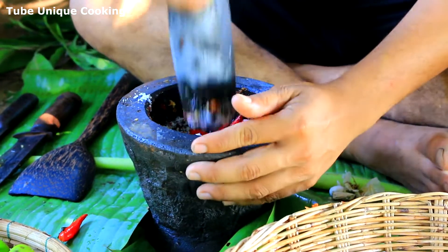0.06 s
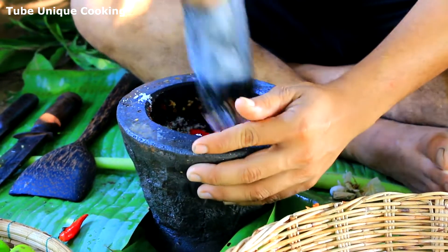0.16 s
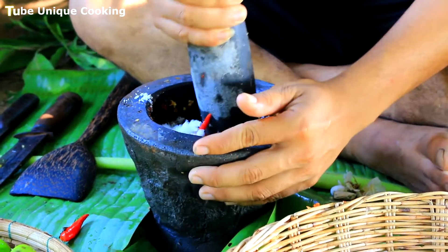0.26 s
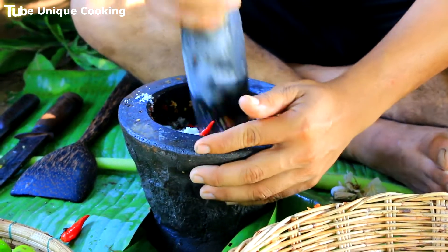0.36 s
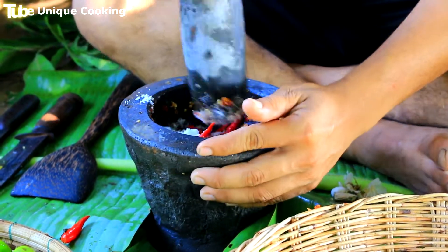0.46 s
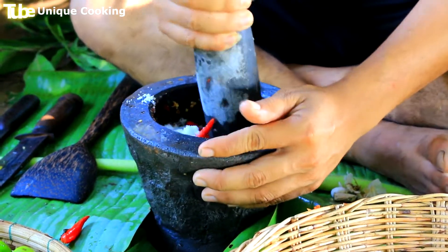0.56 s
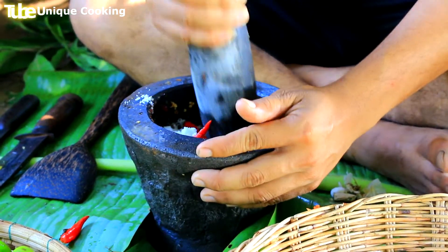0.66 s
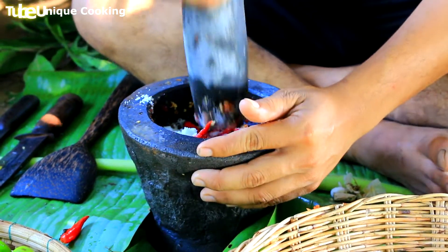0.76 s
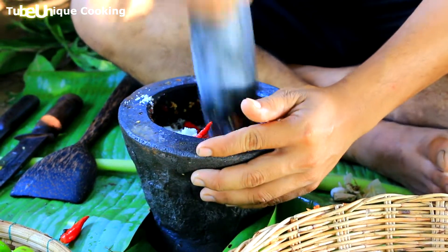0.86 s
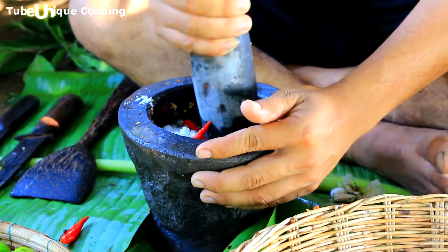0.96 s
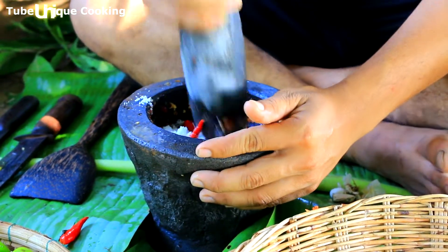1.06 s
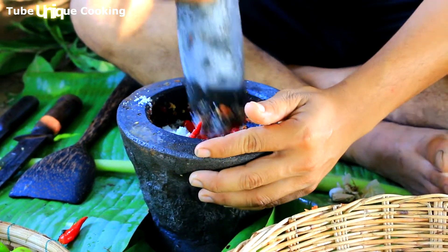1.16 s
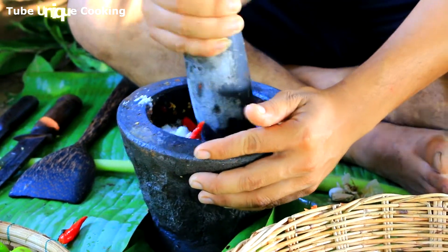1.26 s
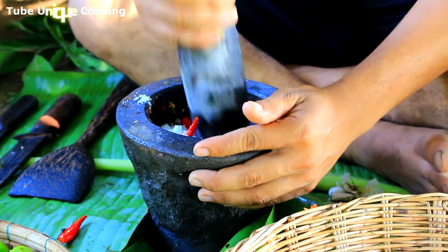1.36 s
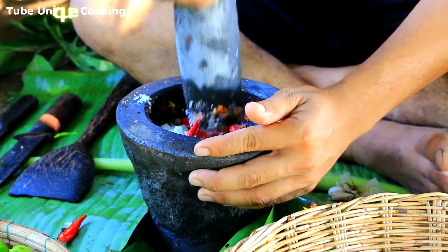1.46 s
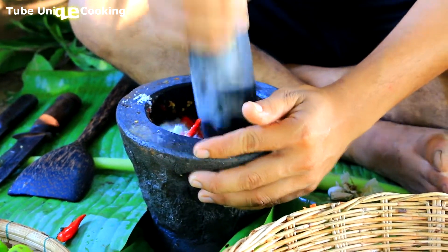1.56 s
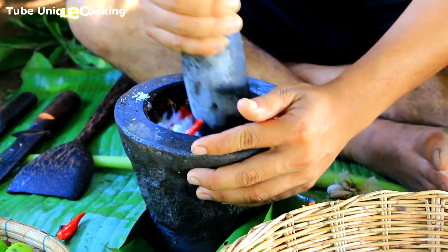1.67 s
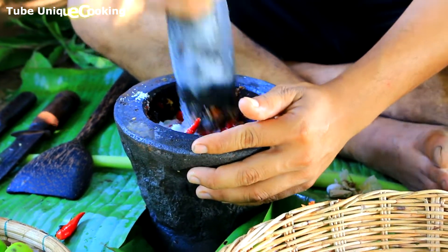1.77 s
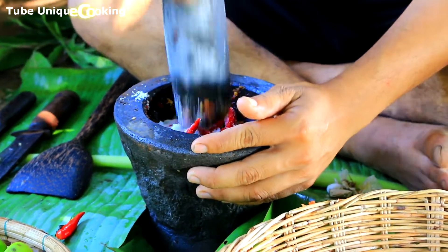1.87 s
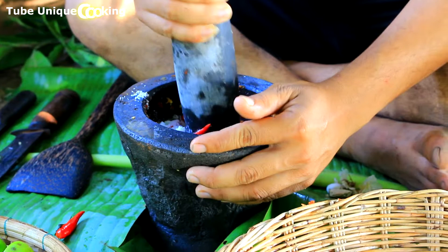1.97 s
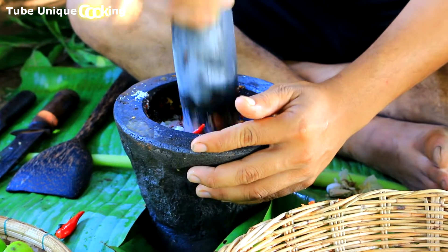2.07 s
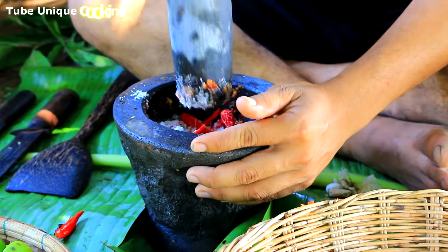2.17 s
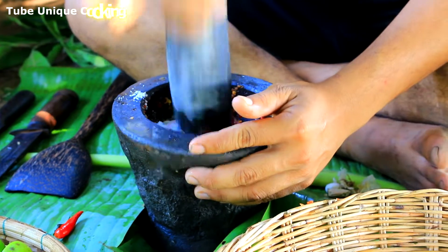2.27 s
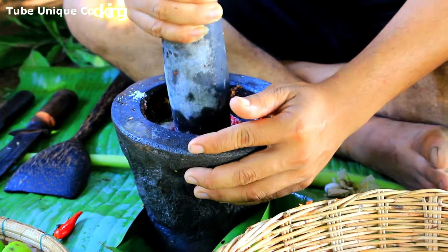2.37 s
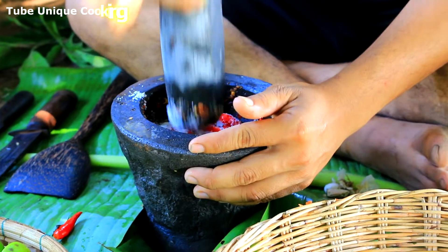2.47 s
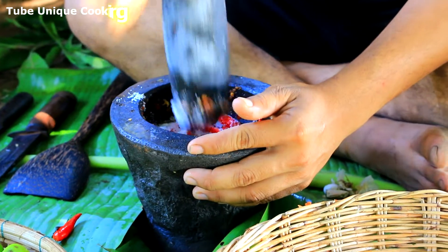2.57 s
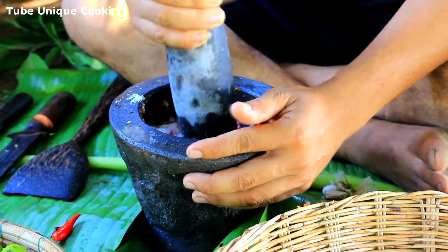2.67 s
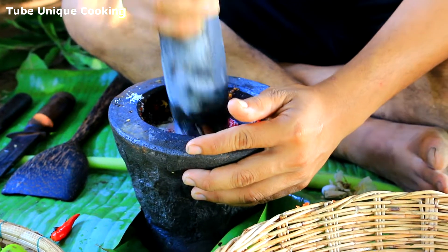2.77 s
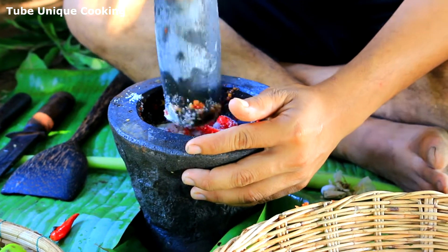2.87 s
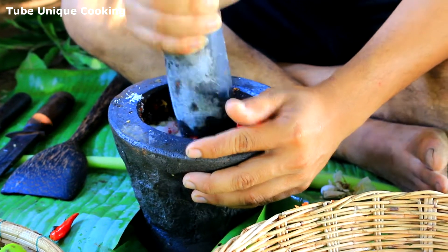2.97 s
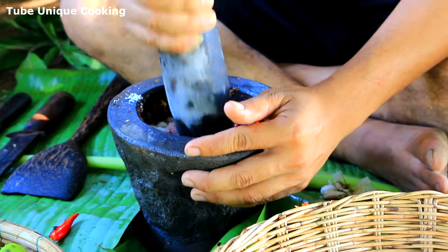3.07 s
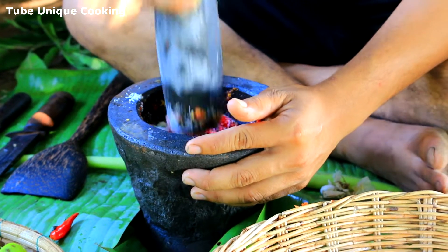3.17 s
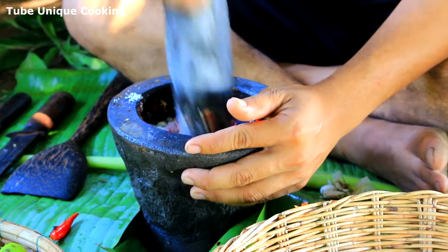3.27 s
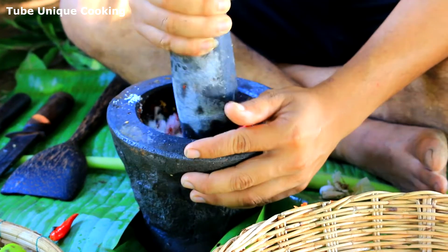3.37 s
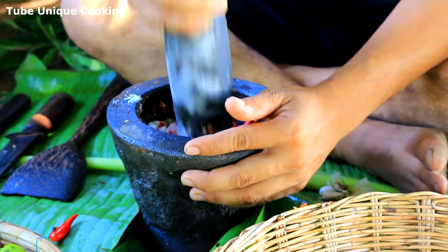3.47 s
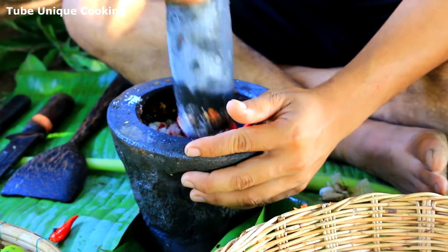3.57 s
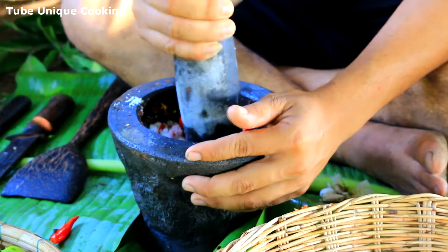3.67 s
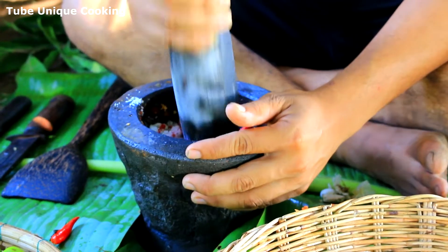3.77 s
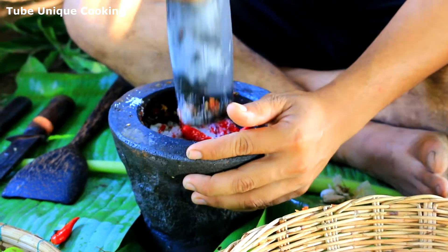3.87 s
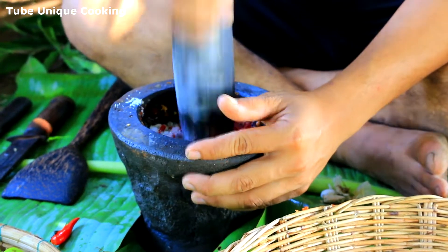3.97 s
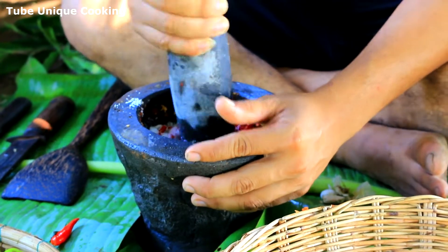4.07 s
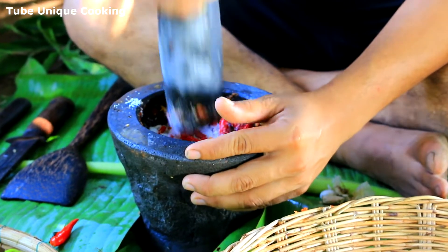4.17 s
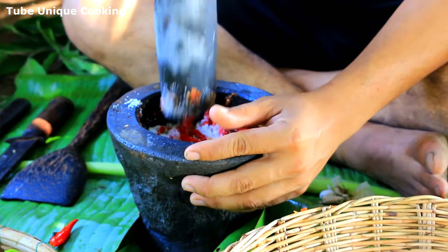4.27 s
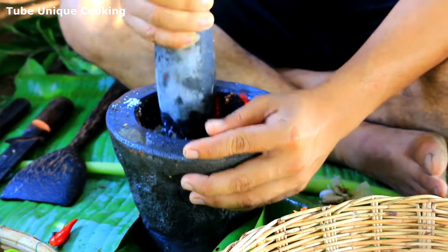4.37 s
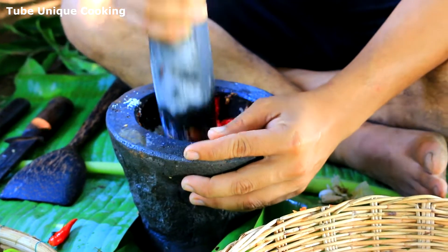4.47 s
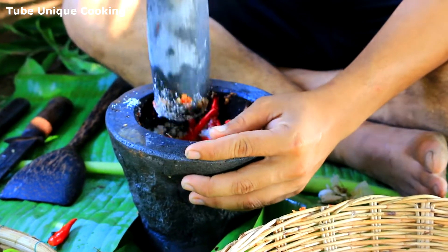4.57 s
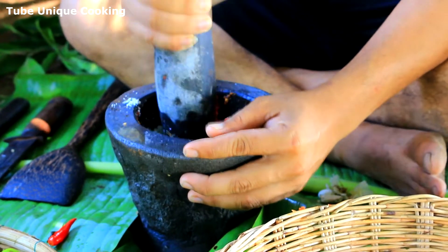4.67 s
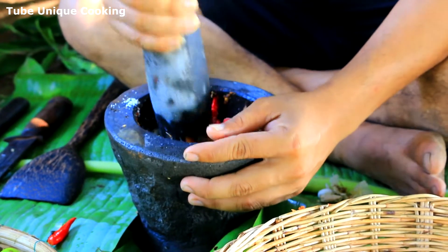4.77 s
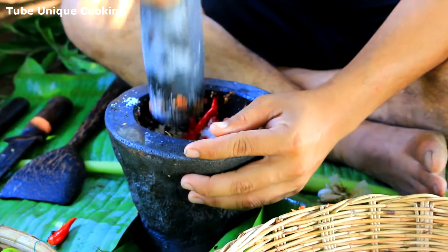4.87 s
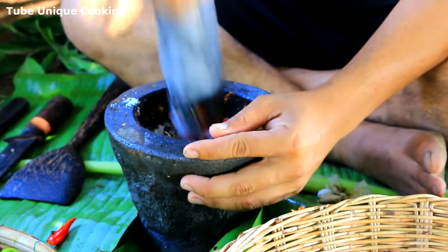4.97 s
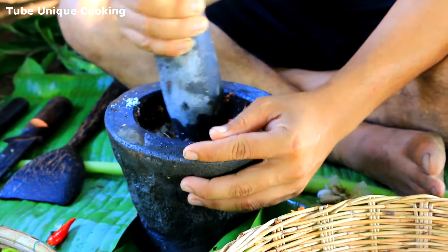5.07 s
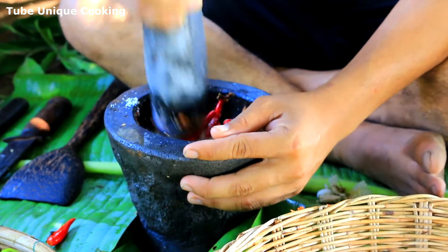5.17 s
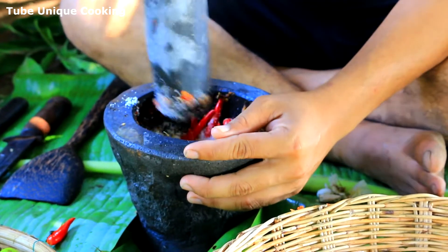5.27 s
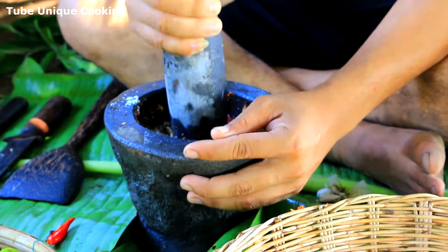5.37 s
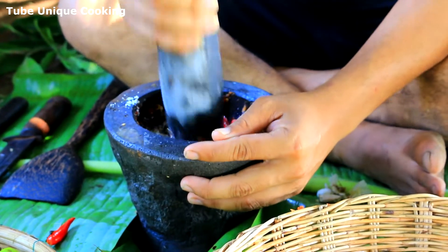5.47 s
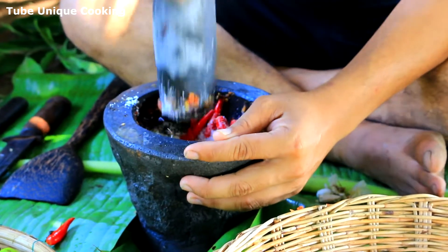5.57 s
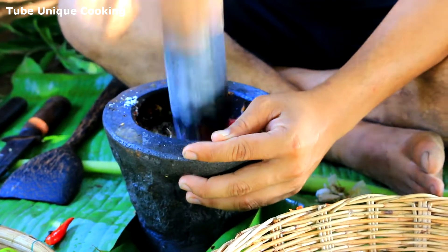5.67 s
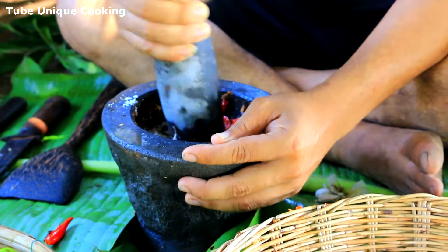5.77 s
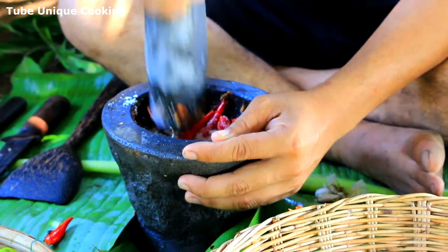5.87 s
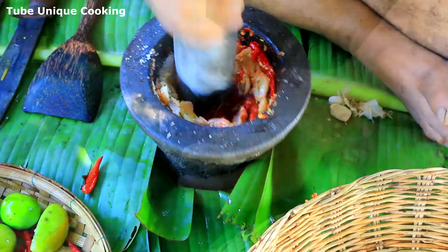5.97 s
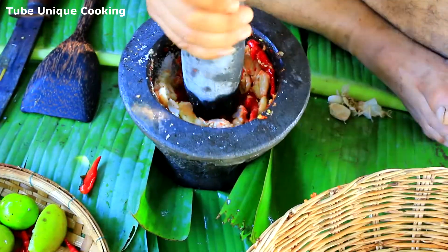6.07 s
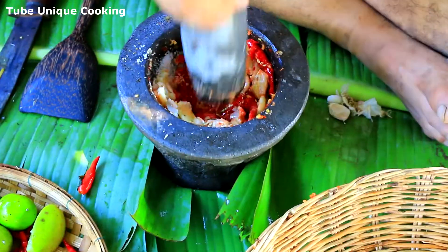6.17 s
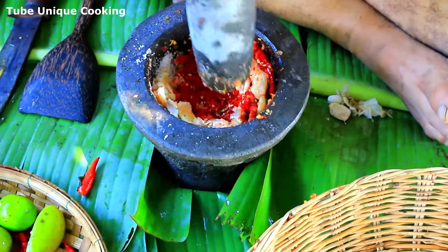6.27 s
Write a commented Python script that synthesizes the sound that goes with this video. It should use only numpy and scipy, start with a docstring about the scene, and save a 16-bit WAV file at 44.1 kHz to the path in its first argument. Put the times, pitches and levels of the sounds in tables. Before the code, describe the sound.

Outdoors and close to the microphone, a stone pestle pounds chillies and salt in a stone mortar, starting at 0.24 s and repeating about every 0.35 s until 6.0 s, with a barely audible touch at 6.1 s. Each stroke is a brief gritty crunch with a muted stone knock and fine wet crackle; many add a low damped thump into soft ground, strong around 0.9-1.3 s. A bird flicks short whistles at 0.6-0.75 s, holds one at 0.9 s, then trills evenly near 3 kHz from 1.0 to 2.5 s, sinking and fading, with a tiny chirp around 2.8 s. From about 3.7 s knocks become harder, clearest at 4.0 and 5.4 s, with heavy thumps from 4.7 to 5.7 s. Grit ticks fall between strokes. Faint blurred calls, steady airy hiss and uneven low bumps lie behind, with slight open-air reflections.

```python
"""Pestle and mortar outdoors

A stone pestle pounds chillies and salt in a stone mortar on leaves: each stroke is a swarm of cracks filtered
by the bowl, a knock of stone on stone and damped low modes as the mortar thumps the ground. Grit ticks and wet
paste crackles, both as shaped noise. A bird trills in gliding near-sinusoids and others call further off as
narrow gliding bands, over the steady filtered noise of quiet air and an uneven low rumble with soft bumps.
"""
import sys
import numpy as np
from scipy import signal
from scipy.fft import rfft, irfft
from scipy.io import wavfile
from scipy.ndimage import uniform_filter1d

SR = 44100
rng = np.random.default_rng(int(sys.argv[2]) if len(sys.argv) > 2 else 0)


def waveform_to_disk(signal):
    """Save audio, clipped to [-1, 1], as 16-bit WAV at the path in sys.argv[1]."""
    frames = np.transpose(np.atleast_2d(signal))
    scaled = np.clip(frames, -1, 1) * 32767
    samples = np.round(scaled).astype(np.int16)
    wavfile.write(sys.argv[1], SR, samples)


N = 279153
TIME = np.arange(N) / SR

# Pestle strokes and a last light touch: greatest_force_s, crunch_db, crunch_length_s,
# treble_tilt_db_per_octave, knock_db, knock_pitch_hz, thump_peak_db
STROKES = [ (0.241, -34, 0.012, 2.5, -49, 1880, -52.5), (0.5816, -36, 0.011, 1.5, -41.5, 1890, -33.5),
           (0.934, -35.5, 0.01, 0.5, -51, 1910, -26.5), (1.266, -33.5, 0.0086, 1.5, -50, 1050, -24.5),
           (1.608, -32.5, 0.011, 1, -41, 1630, -58), (1.9477, -37, .013, 0.5, -53, 1910, -55),
           (2.309, -35.5, 0.014, 1.5, -56, 2500, -45.5), (2.665, -38, 0.011, .5, -41.5, 2000, -33),
           (2.992, -36, 0.011, 1, -46, 2200, -44.5), (3.347, -35.5, 0.012, 1.6, -47, 1890, -38),
           (3.6753, -35.5, 0.0071, -0.8, -39, 1850, -28.5), (4.015, -31, .0055, -1, -30, 1860, -45),
           (4.364, -31.5, 0.015, 1.7, -43, 2020, -46), (4.7003, -34, 0.0052, 2.5, -37.5, 1770, -27.5),
           (5.035, -34.5, 0.007, 1, -46, 1100, -27), (5.3839, -32.5, 0.0055, 0.5, -25.5, 1345, -24),
           (5.7204, -34, 0.0058, 1.3, -39.5, 1670, -20), (6.0207, -33.5, .013, -0.6, -34, 1440, -39),
           (6.1248, -53, 0.0057, -2.5, -49.5, 3440, -59)]
# Bird syllables that the song names: attack_s, release_s, contour as points of time_s, pitch_hz before a shift
FLICK = (0.02, 0.024, [(0, 2870), (.021, 3177), (.028, 3506), (.036, 2600), (.06, 1480)])
HELD = (0.04, 0.039, [(0, 2973), (.031, 3075), (.047, 3032), (.055, 2600), (.074, 1924)])
ARCH = (0.011, .006, [(0, 3220), (.006, 3700), (.015, 3880), (.021, 3860), (.026, 3610)])
PIP = (0.0037, 0.012, [(0, 3434), (.021, 3530), (.05, 3370)])
DIP = (0.0028, 0.0043, [(0, 1984), (.008, 1620), (.031, 1420), (.062, 2076)])


def undb(db):
    """Amplitude ratio: 20 dB is a factor of ten."""
    return 10 ** (np.asarray(db) / 20)


def unit(x):
    """Normalisation of effective amplitude: scale to rms 1."""
    return x / np.sqrt(np.mean(x ** 2))


def burst(x, db):
    """Energy equivalence: a short sound gets the energy of 10 ms at this level."""
    energy = np.sum(np.atleast_2d(x) ** 2, axis=1).mean()
    return x * undb(db) * np.sqrt(SR / 100 / energy)


def add(out, s, x):
    """Linear superposition: mix a short sound into out from time s."""
    i = max(int(s * SR), 0)
    out[..., i:i + x.shape[-1]] += x[..., :N - i]


def colour(x, points, tilt_db=0):
    """Minimum-phase filtering: a causal response through (Hz, dB) points, tilted in dB per octave."""
    size = 8192
    hz, db = np.transpose(points)
    octave = np.log2(np.maximum(np.fft.rfftfreq(size, 1 / SR), 1))
    # the tilt pivots at 3 kHz and stops growing two octaves below it
    tilt = tilt_db * np.maximum(octave - np.log2(3000), -2)
    gain = undb(np.interp(octave, np.log2(hz), db) + tilt)
    # folding the cepstrum onto positive time makes the response minimum phase
    cepstrum = irfft(np.log(gain))[:size // 2]
    cepstrum[1:] *= 2
    response = irfft(np.exp(rfft(cepstrum, size)))[None, :size // 2]
    return signal.fftconvolve(np.atleast_2d(x), response)[:, :x.shape[-1]]


def pan(left_db):
    """Interaural level difference: gains of the two channels, left above right by left_db."""
    return undb(np.array([[left_db], [-left_db]]) / 2)


def noise(size, side_db):
    """Partial coherence: a common mid noise plus an opposed side noise at side_db."""
    mid, side = rng.standard_normal((2, size))
    return mid + undb(side_db) * side * np.array([[1], [-1]])


def walk(rate):
    """Slow random modulation: smoothed steps at this rate in Hz, scaled to rms 1."""
    k = max(int(SR / rate), 1)
    steps = np.repeat(rng.standard_normal(N // k + 1), k)
    return unit(uniform_filter1d(steps, k)[:N])


def ring(modes, length, scatter):
    """Modal superposition: decaying sines, each detuned a little at random on every blow."""
    t = TIME[:int(length * SR)]
    out = np.zeros(len(t))
    for hz, t60, db in modes:
        detuned_hz = hz * (1 + scatter * rng.standard_normal())
        out += undb(db - 60 * t / t60) * np.sin(2 * np.pi * detuned_hz * t)
    return out


def surroundings(x, t60, wet_db, top_hz, delay):
    """Diffuse scattering from ground and foliage: a decaying noise tail, different in each ear."""
    t = TIME[:SR]
    low_pass = signal.butter(1, min(top_hz, SR / 3), fs=SR)
    tail = signal.lfilter(*low_pass, rng.standard_normal((2, SR)))
    tail *= undb(-60 * t / t60) * (1 - np.exp(-(t / delay) ** 2))
    return signal.fftconvolve(x, undb(wet_db) * unit(tail) / np.sqrt(SR), axes=1)[:, :N]


def air(level_db=-57, waver_db=0.5):
    """Stationary broadband noise: steady outdoor hiss that wavers slightly."""
    # spectrum of the outdoor air: frequency_hz, relative_db_per_hz
    air_spectrum = [(15, -29), (30, 3.5), (75, -4.5), (370, -7), (630, -9.5), (1000, -10), (2000, -13),
                    (3800, -15), (7500, -17.5), (11000, -20), (15500, -25)]
    hiss = unit(colour(noise(N, side_db=-1), air_spectrum))
    return hiss * undb(level_db + waver_db * walk(6.4)) * pan(0.98)


def rumble(flutter_db=3.5):
    """Power addition: uneven low noise swells after strokes and around soft bumps of about one cycle."""
    # level of the low rumble before its gain: time_s, level_db
    rumble_levels = [(0.0, -62.5), (0.63, -62), (0.88, -53), (1.16, -53.5), (1.43, -51.5), (1.62, -69),
                     (2.04, -62), (2.86, -70.5), (3.19, -66), (3.44, -73), (3.7, -53), (3.84, -57.5),
                     (4.32, -54.5), (4.53, -71), (4.95, -67), (5.59, -59.5), (5.75, -65), (6.33, -52.5)]
    # soft low bumps: centre_s, level_db, pitch_hz
    bumps = [(1.202, -41.5, 129), (1.51, -38.5, 117), (1.806, -42.5, 103), (1.92, -39, 110),
             (1.968, -43, 109), (2.138, -41, 86), (2.408, -42, 142), (2.46, -37.5, 105), (3.012, -40, 113),
             (3.164, -41.5, 84), (5.345, -46, 128), (5.651, -44, 102), (6.013, -35.5, 153),
             (6.194, -41.5, 100), (6.221, -37.5, 173)]
    gain_db = -0.5  # on the rumble levels
    bump_s = 0.0038  # spread of a bump's bell-shaped amplitude
    flurry_db, flurry_s = -11, 0.035  # swell around each bump: level against the bump, half length
    settle_db, settle_s = -55, 0.096  # after each stroke, while the mortar settles on the leaves

    spectrum = [(15, -42), (35, -5.5), (65, 3), (120, 0), (200, -7.5), (320, -18.0), (600, -36.0), (2000, -48.0)]
    band = colour(noise(N, side_db=-3.0), spectrum)
    power = undb(np.interp(TIME, *np.transpose(rumble_levels)) + gain_db) ** 2
    settling = undb(settle_db) * np.exp(-TIME[:SR // 2] / settle_s)
    for s, *_ in STROKES:
        add(power, s, settling ** 2)
    for s, db, _ in bumps:
        power += undb(db + flurry_db) ** 2 * np.exp(-((TIME - s) / flurry_s) ** 2)
    out = unit(band) * np.sqrt(power) * undb(flutter_db * walk(35))

    t = TIME[:SR // 10] - 0.05  # zero at the middle of the bump
    for s, db, hz in bumps:
        swell = np.sqrt(2) * undb(db) * np.exp(-0.5 * (t / bump_s) ** 2)
        add(out, s + t[0], swell * np.sin(2 * np.pi * (hz * t + rng.random())))
    return out * pan(6.4)


def whistle(syllable, db, shift_hz):
    """Frequency modulation: a gliding tone with a faint octave swells, holds and fades."""
    attack, release, contour = syllable
    when, hz = np.transpose(contour)
    t = TIME[:int(when[-1] * SR)]
    phase = 2 * np.pi * np.cumsum(np.interp(t, when, hz) + shift_hz) / SR
    tone = np.sqrt(2) * (np.sin(phase) + undb(-37.5) * np.sin(2 * phase))
    opening = np.minimum(np.minimum(t / attack, (t[-1] - t) / release), 1)
    return tone * undb(db) * np.sin(np.pi / 2 * opening) ** 2


def birds(waver_hz=14):
    """Near-sinusoidal whistling: single notes and a trill, with echoes from the trees around the birds."""
    # single notes before and after the trill: start_s, syllable, level_db, pitch_shift_hz
    song = [(0, PIP, -44.5, 4), (0.618, FLICK, -40, 16), (0.746, FLICK, -38.5, 8),
            (0.882, HELD, -30.5, 7.5), (2.613, DIP, -53.5, 13), (2.745, ARCH, -40.5, 270),
            (2.778, ARCH, -37.5, 13), (2.810, ARCH, -41, -170)]
    # the trilled syllable: attack_s, release_s, contour as points of time_s, pitch_hz before a shift
    slur = (0.033, 0.012, [(0, 2980), (.021, 3093), (.044, 2948), (.06, 2895), (.082, 2893)])
    # the trill repeats one slur evenly, sinking and fading as it goes
    trill_start_s, trill_period_s, trill_count = 1.031, 0.1425, 11
    trill_db, fade_db_per_s = -32, 1.9
    trill_shift_hz, sag_hz_per_s = 31.4, 46.4
    trill_echo_db, song_echo_db = 1.5, 3.5  # how strongly each reaches the trees

    notes, trill = np.zeros((2, N))
    for s, syllable, db, shift_hz in song:
        add(notes, s, whistle(syllable, db, shift_hz))
    for age in trill_period_s * np.arange(trill_count):
        shift_hz = trill_shift_hz - sag_hz_per_s * age + waver_hz * rng.standard_normal()
        add(trill, trill_start_s + age, whistle(slur, trill_db - fade_db_per_s * age, shift_hz))
    echoing = (notes * undb(song_echo_db) + trill * undb(trill_echo_db))[None]
    near = surroundings(echoing, t60=0.05, wet_db=-14.5, top_hz=7900, delay=0.0093)
    far = surroundings(echoing, t60=0.99, wet_db=-21.5, top_hz=8000, delay=0.012)
    return (notes + trill + near[0] + far[0]) * pan(0.14)


def paste(cling_db=-21, cling_s=0.09):
    """Random crackling: fine wet grains linger after each stroke and stir when the paste slides."""
    # wet paste shifting in the bowl: centre_s, level_db, spread_s
    squelches = [(.2, -60, .02), (3.14, -61, 0.016), (3.93, -66, 0.04), (4.13, -71, 0.14),
                 (4.28, -63.5, 0.055), (4.48, -69, 0.034)]
    amount = np.zeros(N)
    for s, db, spread in squelches:
        amount += undb(db) * np.exp(-0.5 * ((TIME - s) / spread) ** 2)
    for s, db, *_ in STROKES:
        add(amount, s, undb(db + cling_db) * np.exp(-TIME[:SR // 4] / cling_s))
    # exponential chance in dB makes a few grains stand out
    grains = noise(N, side_db=-1.5) * undb(4.5 * np.minimum(rng.exponential(size=N), 5))
    spectrum = [(400, -29), (2000, 1.0), (7000, 0), (11000, -4.5), (16000, -16)]
    return amount * unit(colour(grains, spectrum)) * pan(1.3)


def cracks(t, rise, fall, grain_db, sharpness):
    """Pressure-driven fracture: random crack strengths under a pressure that swells and falls."""
    pressure = np.exp(-0.5 * np.abs(t / np.where(t < 0, rise, fall)) ** sharpness)
    return pressure * undb(grain_db * np.minimum(rng.exponential(size=len(t)), 4))


def crush(t, rise, fall, tilt_db, grain_db=3, sharpness=1.287, lead=0.00066, ring_db=-35):
    """Source and resonator: brittle grains crack first by the lead, packed paste answers duller, stone rings."""
    # bowl and pestle, damped by hand and paste: frequency_hz, t60_s, level_db
    stone_modes = [(1060, 0.078, -11), (1368, 0.02, 0), (1576, 0.033, -20), (1953, 0.017, 2),
                   (2130, 0.018, -11), (2700, 0.02, -5), (2810, 0.009, -4.5), (3900, 0.015, -10),
                   (4630, 0.016, -17)]
    # colour of the crunch in the bowl: frequency_hz, gain_db
    bowl_colour = [(120, -19), (450, -8.5), (780, -2.5), (1300, -3), (1900, 0), (2600, 5), (3600, -1.5),
                   (5400, -4), (7800, -4), (10000, -8.5), (13000, -11.5), (16000, -21)]
    brittle = cracks(t + lead, rise, fall, grain_db, sharpness) * noise(len(t), side_db=-5.5)
    brittle = colour(brittle, [(1500, -25.5), (3000, -5.5), (5500, -1.0)])
    packed = cracks(t, rise, fall, grain_db, sharpness) * noise(len(t), side_db=-24)
    packed = colour(packed, [(2500, 0.5), (4500, 1.0), (8000, -11.0)])
    force = brittle + packed
    stone_ring = ring(stone_modes, length=0.04, scatter=0.021)[None]
    body = signal.fftconvolve(force, stone_ring, axes=1)[:, :len(t)]
    return colour(force + undb(ring_db) * body, bowl_colour, tilt_db)


def knock(hz, t60=0.01, ring_db=-15):
    """Impulsive excitation: stone meets stone in a click and a brief ring whose pitch varies by landing."""
    # colour of stone meeting stone through the paste: frequency_hz, gain_db
    knock_colour = [(150, 0.5), (900, -25.5), (1300, -7), (2000, 1.5), (2800, 6), (3300, 0), (4400, -6.5),
                    (5500, -11), (9000, -18), (16000, -33)]
    t = TIME[:SR // 20]
    click = signal.unit_impulse(len(t))
    return colour(click + undb(ring_db - 60 * t / t60) * np.cos(2 * np.pi * hz * t), knock_colour)


def ground_thump(thud_db=-20, thud_t60=0.14):
    """Damped oscillation on a cushion: the mortar rocks on soil and leaves, which rattle dully under it."""
    # the mortar rocking on the ground: frequency_hz, t60_s, relative_db
    ground_modes = [(71.9, 0.26, -14), (124.1, 0.13, -3), (159.6, 0.067, 2), (277, 0.087, -13)]
    thump = ring(ground_modes, length=0.2, scatter=0.077)
    age = TIME[:len(thump)]
    spectrum = [(80, -25.5), (200, 0.0), (300, -9.5), (450, -6.5), (800, -6.0), (1500, -20.5), (4000, -75)]
    thud = unit(colour(noise(len(age), side_db=-18), spectrum))
    cushion = 1 - np.exp(-age / 0.0016)  # leaves and soil soften the push
    thump = thump * cushion
    return thud * cushion * undb(thud_db - 60 * age / thud_t60) - thump / thump.max()


def pounding():
    """Successive impacts: the pestle crushes grains and meets the stone, and the mortar thumps the ground."""
    # share of a crunch spent building up; a longer crunch peaks proportionally earlier and lingers:
    # crunch_length_s, share
    rise_share = [(.005, 0.63), (.013, 0.35)]
    # grit snapping between strokes: peak_s, level_db, treble_tilt_db_per_octave
    ticks = [(1.0302, -52, 6), (2.366, -55, 3.5), (3.0176, -47.5, 0.5), (3.392, -54, -1), (4.6278, -43, 11),
             (4.791, -57.5, 6), (5.2153, -48, 8.5), (5.551, -53, 4), (5.787, -56.5, -0.5)]
    thump_lag_s = 0.00197  # the mortar meets the ground just after the greatest force
    tick_s = 0.00088  # rise and fall of a snap

    out, low = np.zeros((2, 2, N))
    t = TIME[:SR // 5] - 0.05  # zero at the greatest force
    for s, db, length, tilt_db, knock_db, knock_hz, thump_db in STROKES:
        share = np.interp(length, *np.transpose(rise_share))
        rise = length * np.clip(share, 0.1, 0.9)
        add(out, s + t[0], burst(crush(t, rise, length - rise, tilt_db), db))
        add(out, s, burst(knock(knock_hz), knock_db))
        add(low, s + thump_lag_s, undb(thump_db) * ground_thump())
    for s, db, tilt_db in ticks:
        add(out, s + t[0], burst(crush(t, tick_s, tick_s, tilt_db, lead=0), db))
    out = out * pan(3.4)
    near = surroundings(out, t60=0.12, wet_db=-14.0, top_hz=6000, delay=0.0034)
    far = surroundings(out, t60=0.28, wet_db=-27.5, top_hz=5360, delay=0.013)
    return out + near + far + low * pan(4.0)


def far_calls():
    """Quadrature modulation: low-passed noise on a gliding carrier, like a call smeared by many echoes."""
    # far calls, blurred by the trees: start_s, end_s, start_hz, end_hz, level_db, width_hz
    calls = [(0.287, 0.599, 2044, 2014, -67, 200), (0.729, 0.958, 4200, 6040, -61, 600),
             (3.931, 4.438, 1048, 1082, -59.5, 335), (4.176, 4.4, 4270, 5940, -62, 800),
             (5.391, 5.624, 3540, 5800, -59.5, 520), (5.529, 5.681, 5200, 6150, -60, 1000),
             (5.906, 6.02, 5400, 6260, -62.5, 1200)]
    out = np.zeros((2, N))
    for start, end, from_hz, to_hz, db, width_hz in calls:
        size = int((end - start) * SR)
        phase = 2 * np.pi * np.cumsum(np.linspace(from_hz, to_hz, size)) / SR
        low_pass = signal.butter(2, width_hz / 2, fs=SR, output="sos")
        in_phase = signal.sosfilt(low_pass, noise(size, side_db=-0.5))
        quadrature = signal.sosfilt(low_pass, noise(size, side_db=-0.5))
        band = unit(in_phase * np.cos(phase) + quadrature * np.sin(phase))
        add(out, start, undb(db) * band * signal.windows.tukey(size, 0.6))
    return out


def scene():
    """Superposition of sources: the mortar close by, the birds and the air around it."""
    return air() + rumble() + birds() + paste() + pounding() + far_calls()


def record(dry):
    """Band limiting: the microphone thins the deepest bass and the recorder cuts the top."""
    high_pass = signal.butter(2, 34, "high", fs=SR, output="sos")
    low_pass = signal.ellip(10, 0.1, 80, 15900, fs=SR, output="sos")
    return signal.sosfilt(low_pass, signal.sosfilt(high_pass, dry))


dry = scene()
out = record(dry)
waveform_to_disk(out)
```